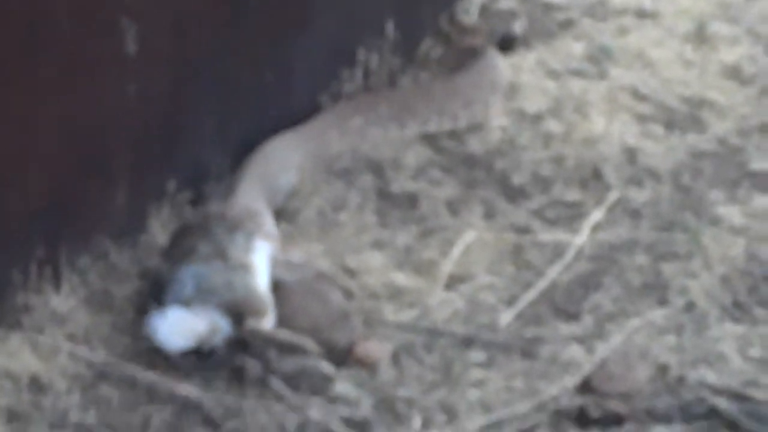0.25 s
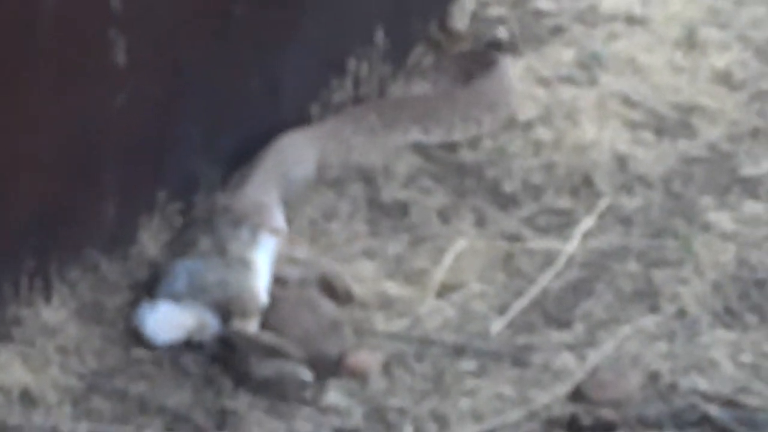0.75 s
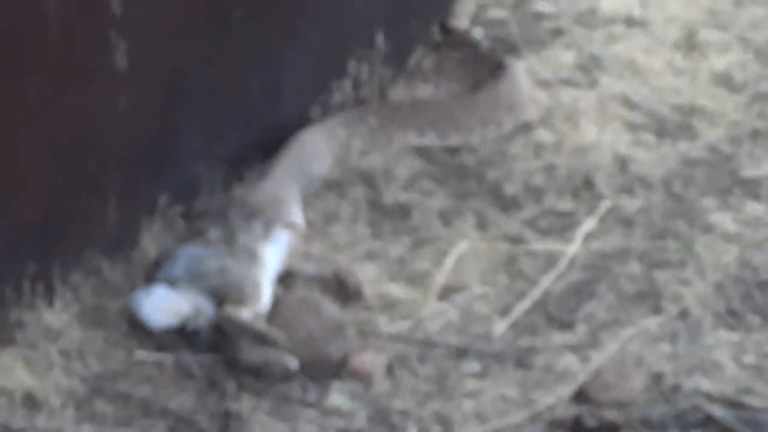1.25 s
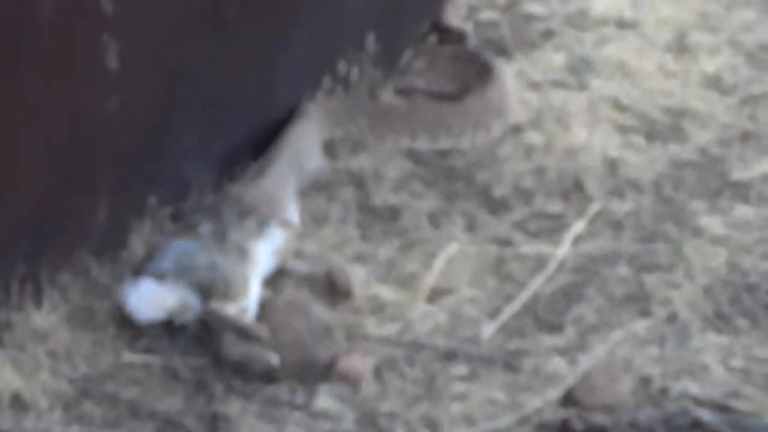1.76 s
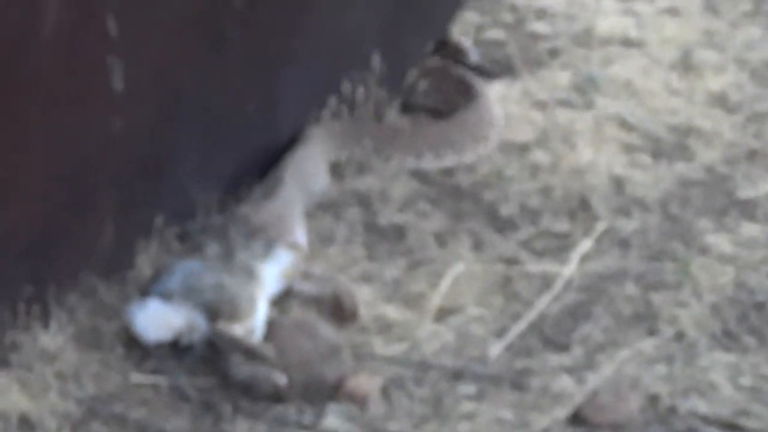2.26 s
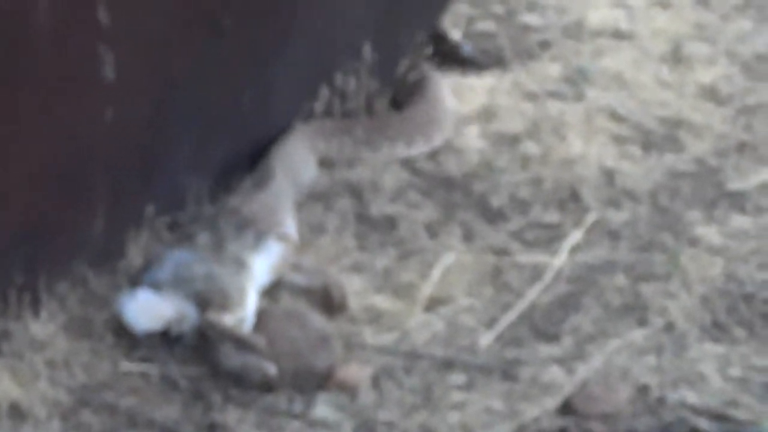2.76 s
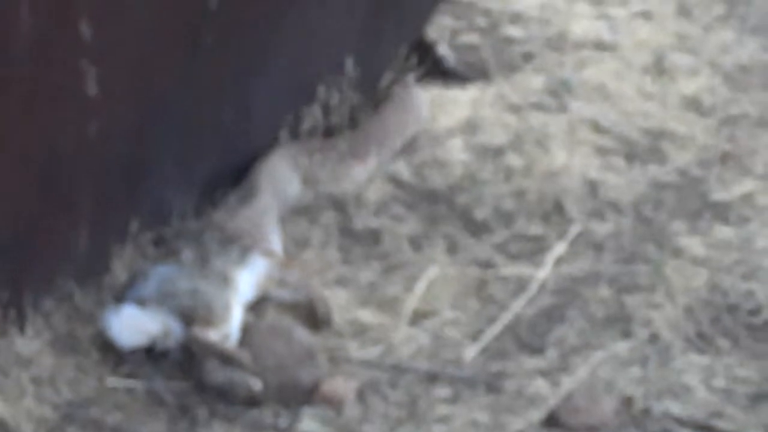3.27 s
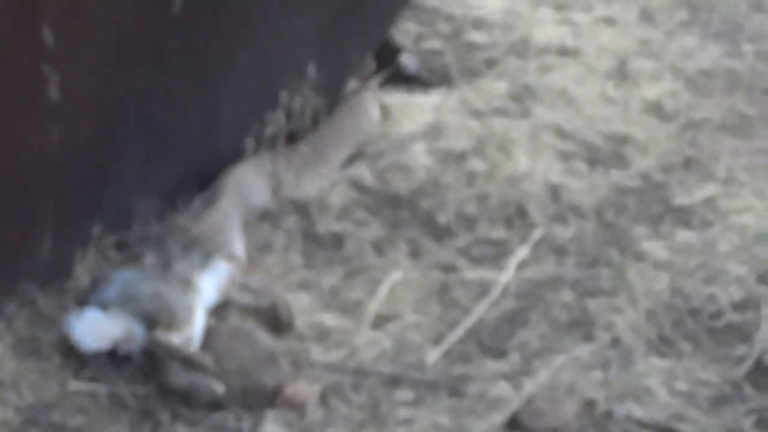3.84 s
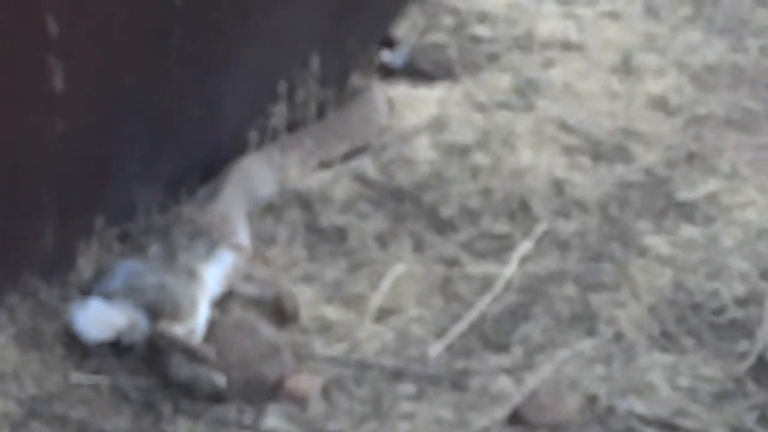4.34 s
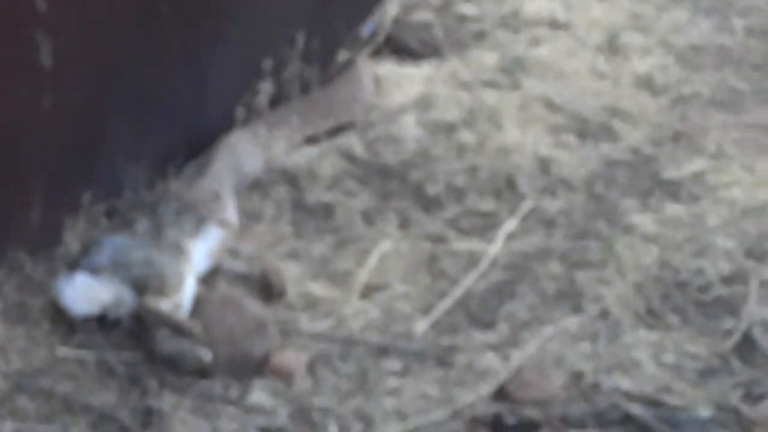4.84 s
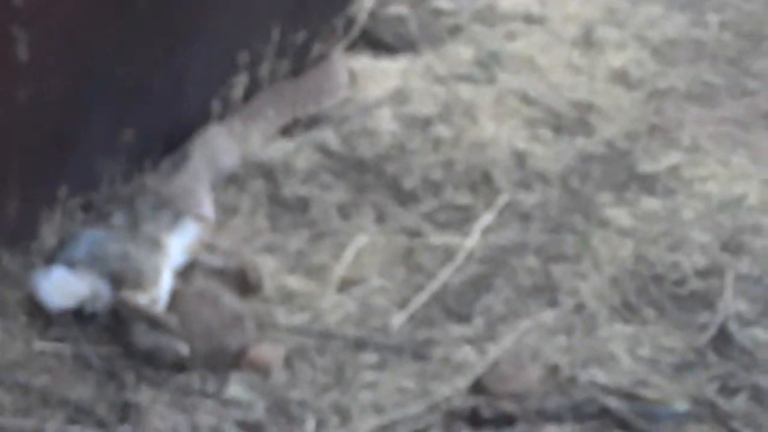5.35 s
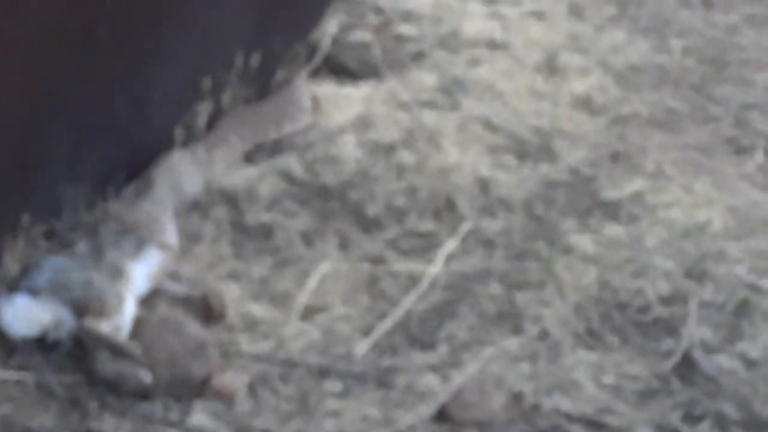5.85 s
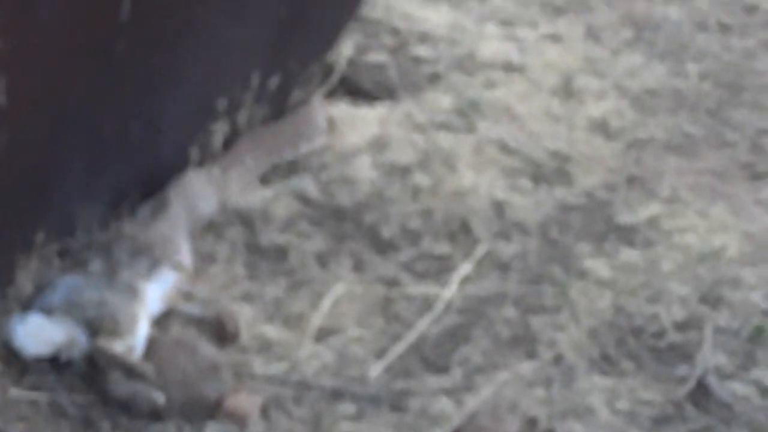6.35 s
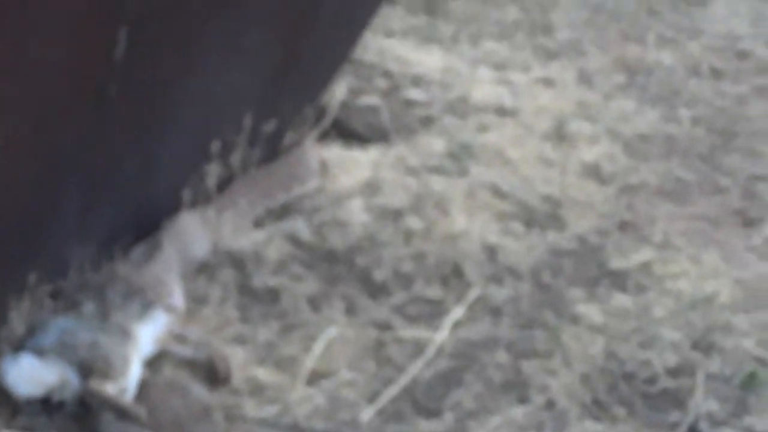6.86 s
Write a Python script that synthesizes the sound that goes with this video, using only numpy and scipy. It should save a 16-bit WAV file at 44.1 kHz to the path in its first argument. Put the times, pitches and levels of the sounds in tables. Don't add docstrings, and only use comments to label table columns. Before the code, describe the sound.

Harsh sizzling tail rattle over faint hiss, with a brief faint motor hum early on and a burst of dull wind buffeting near the end.

```python
import sys
import numpy as np
from scipy import signal
from scipy.fft import rfft, irfft, next_fast_len
from scipy.io import wavfile
from scipy.ndimage import uniform_filter1d, map_coordinates

SR = 44100
rng = np.random.default_rng(int(sys.argv[2]) if len(sys.argv) > 2 else 0)


def waveform_to_disk(signal):
    frames = np.transpose(np.atleast_2d(signal))
    scaled = np.clip(frames, -1, 1) * 32767
    samples = np.round(scaled).astype(np.int16)
    wavfile.write(sys.argv[1], SR, samples)


def level_to_linear(level):
    exponent = np.asarray(level, float) / 20
    return 10 ** exponent


N = 313103

# frequency in Hz, density in dB per Hz.
AIR_COLOUR = [(60, -5.5), (200, 2.5), (350, 6), (600, 0.5), (1000, 0), (1500, -1.5), (2000, -1.5),
              (2600, -6), (6000, -13.5), (16000, -4.5)]
# frequency in Hz, level in dB.
AIR_OWN = [(60, -32), (150, 9), (300, -3.5), (700, 4), (1400, -21.5), (3000, -11.5), (16000, -10)]
AIR_DB, AIR_FADE_DB_PER_S = -58, 0.746

# frequency in Hz, density in dB per Hz.
WIND_COLOUR = [(20, -2.5), (50, -14.5), (80, -9), (110, 9.5), (150, -5), (220, -6), (350, -24.5),
               (600, -23), (1200, -43)]
# frequency in Hz, level in dB.
WIND_OWN = [(20, -10), (60, -1), (150, -14), (500, -6)]
# middle in seconds, peak in dB, half length in seconds.
GUSTS = [
    (4.552, -51, 0.15),
    (4.903, -73, 0.055),
    (5.112, -58, 0.031),
    (5.76, -48, 0.037),
    (5.96, -48.5, 0.097),
    (6.368, -58.5, 0.18),
    (6.99, -67, 0.14),
]
# time in seconds, peak in dB, frequency in Hz.
EDDIES = [(4.418, -52, 110), (4.469, -42, 120), (4.536, -53, 102), (4.57, -45.5, 155), (4.607, -49, 109),
          (4.642, -44, 105), (4.662, -45, 108), (4.828, -48, 134), (5.147, -46, 123), (5.176, -46, 115),
          (5.685, -54, 110), (5.718, -46, 94), (5.748, -39, 101), (5.78, -30, 110), (5.805, -39, 192),
          (5.834, -36.5, 240), (5.844, -36.5, 134), (5.865, -42, 139), (5.885, -44, 95), (5.902, -44, 192),
          (5.918, -44, 120), (5.934, -31, 154), (5.951, -42, 111), (5.973, -43, 167), (6.001, -43, 126),
          (6.028, -35, 197), (6.048, -34, 149), (6.073, -39.5, 139), (6.099, -45, 120), (6.115, -46, 142),
          (6.18, -50, 114), (6.236, -46, 96.7), (6.389, -48, 121), (6.588, -50, 108)]
CALM_DB, CALM_FADE_DB_PER_S, FRESH_DB = -57, 2.1, -62
FRESHENS_S = 4.12
TURBULENT_S = 4.36
PORT_PHASE = -0.3

# start in seconds, stop in seconds, level in dB.
MOTOR_RUNS = [
    (0.483, 0.62, -64.5),
    (0.713, 1.76, -63.5),
]
MOTOR_HZ, MOTOR_EDGE_S, MOTOR_SAG_DB_PER_S = 229.3, 0.02, 2

# time in seconds, swings per second.
TAIL_SPEED = [(0.0, 63.58), (0.4, 64.59), (1.25, 63.64), (1.4, 63.02), (1.75, 63.35), (2.05, 61.97),
              (2.95, 60.31), (3.4, 60.94), (3.65, 60.3), (4.3, 61.92), (4.6, 61.81), (4.75, 62.91),
              (5.45, 61.07), (5.85, 61.07), (6.25, 60.73), (7.1, 60.65)]
FIRST_SWING = 2.2
# start in swings, level in dB, fade in swings, spread between swings in dB.
KNOCKS = [
    (-.12, .3, .045, 1.1),
    (0.0, -9, .11, 1.3),
    (.378, -3.5, .045, 1.5),
    (.55, -8.5, .08, 1.5),
]
# time in seconds, peak in dB.
HARD_KNOCKS = [(0.0256, -37), (0.0717, -29.5), (0.1049, -28.5), (0.183, -29), (0.2457, -27), (0.2772, -35),
               (0.3077, -28.5), (0.384, -32), (0.4778, -32.5), (0.5075, -33.5), (0.5874, -31.5),
               (0.6494, -32), (0.68, -30.5), (0.7415, -32), (0.7738, -28.5), (0.8505, -30), (1.0388, -36.5),
               (1.4485, -37), (1.5756, -35), (1.6543, -37), (1.6864, -36), (1.7489, -32.5), (1.7961, -32),
               (1.8462, -30), (1.9395, -32.5), (1.97, -35.5), (2.0843, -30), (2.1326, -31), (2.2157, -37.5),
               (2.2636, -28.5), (2.3034, -28), (2.36, -31), (2.4105, -28.5), (2.442, -34), (2.4738, -34),
               (2.5232, -28.5), (2.557, -32), (2.6562, -29), (2.7368, -34), (2.8526, -32.5),
               (2.8837, -32.5), (2.9176, -32), (2.9846, -29.5), (3.035, -29), (3.067, -37), (3.1342, -38),
               (3.3478, -36.5), (3.3964, -31.5), (3.4305, -33.5), (3.5787, -31), (3.6142, -36),
               (3.677, -35), (3.728, -37.5), (3.827, -38.5), (3.9427, -32), (4.006, -32), (4.2519, -32),
               (4.4133, -38), (4.5092, -30.5), (4.6385, -35.5)]
HARD_UNDER_DB, HARD_FADE_S = 13.5, 0.0006
# time in seconds, force in dB, turn in dB.
SHAKING = [(0, -40.5, -18.5), (0.8, -42, -15.5), (0.9, -43, -16), (1.0, -49, -6.5), (1.1, -50, -4.5),
           (1.3, -51.5, 1), (1.5, -46, -2.5), (2.1, -45.5, 1), (2.4, -44, -1), (3.0, -44.5, -2),
           (3.2, -46, -0.8), (3.8, -48.5, -3.5), (4.4, -47, -6), (4.7, -50, -6), (5.0, -54.5, -10.5),
           (5.8, -55, -7.5), (6.4, -58.5, -5.5), (7.09, -59, -5)]
MEAN_FORCE_DB = -48
CHATTER_DB, CONTACTS_PER_S, SIZE_SPREAD_DB = -17, 17000, 2.36
EVENNESS, KNOCK_SAMPLES = 0.75, 61
SHELTER_S, SHELTER_RAMP_S = 4.72, 0.15

# frequency in Hz, width in Hz, level in dB.
BODY = [(2868, 965, 2.5), (3216, 520, 10), (3796, 740, -2)]
# frequency in Hz, width in Hz, level in dB.
LARGE = [(4325, 472, 1.5), (5067, 645, 8.8)]
# frequency in Hz, width in Hz, level in dB.
SMALL = [(5680, 300, 3), (6794, 880, 0.5), (7495, 1000, 3.5), (8060, 1020, 1.3)]
# frequency in Hz, width in Hz, level in dB.
RIMS = [(9430, 780, -2)]
# frequency in Hz, width in Hz, level in dB.
EDGES = [(10980, 1680, 2.5), (12030, 1800, 6.5), (13800, 2420, 3), (14400, 990, 8), (16900, 1200, -16.5)]
# offset in dB, share of force, share of turn, loss in shelter in dB,
# growth of the right port's lag in samples.
ANSWERS = [
    (-58.5, 0.19, 0.064, -4, -0.16),
    (-47, 0.66, 0.67, -1.14, -0.36),
    (-49, 1, -0.011, 0.5, -0.14),
    (-65.5, 0.79, -0.33, -15, -0.31),
    (-55, 0.09, -0.18, -6, 0.63),
]

# frequency in Hz, left over right in dB.
SHADE = [(150, -3.5), (500, 4.5), (2000, -7.5), (2750, 4.5), (3700, -4), (4900, 3), (6100, 4.5), (7700, -9),
         (9000, 2.5), (10200, -4), (11000, -1.5), (11800, -8.5), (13200, 2), (14000, -4.5)]
LATE_SAMPLES = 16
OFFSET = 0.00128
# port, first frequency in Hz, last frequency in Hz, width in Hz, depth in dB.
GAPS = [(0, 5600, 5530, 227, 14), (0, 8030, 7500, 200, 4), (0, 10000, 9600, 250, 7.5),
        (0, 12200, 11400, 280, 8.5), (0, 13450, 12950, 230, 5), (0, 14600, 14700, 350, 3),
        (1, 5900, 5430, 303, 10), (0.999, 10360, 9830, 304, 1.5)]
# frequency in Hz, limit in dB.
DROP_SUM = [(60, -9), (170, -12), (300, -22), (2000, -14), (2330, -5), (2550, 6), (3100, 9), (3500, 3),
            (3900, -14), (5500, -8), (8300, -6), (10000, -2), (14000, -3), (15000, -1)]
# frequency in Hz, limit in dB.
DROP_DIFFERENCE = [(500, -22), (1000, -4), (1500, -8), (4000, -4), (4700, -13), (7000, -10), (9300, -6),
                   (12400, -5), (14200, -6), (14700, 0), (16000, 1)]
# frequency in Hz, level in dB.
UNHEARD = [(8600, -110), (9000, -83), (10300, -83), (10700, -110)]
MASKED_HZ, MASKED_DB = 14500, -29.5
FRAME_SHIFT = 861
WHOLE_SHARE, WHOLE_SHARE_LATE, LATE_S = 0.06, 0.2, 4.3


def in_time(rows):
    s, *columns = np.transpose(rows)
    return [np.interp(np.arange(N) / SR, s, column) for column in columns]


def at_hz(points, hz):
    table_hz, table_db = np.transpose(points)
    return np.interp(np.log(np.maximum(hz, 1)), np.log(table_hz), table_db)


def rms_one(x):
    return x / np.sqrt(np.mean(x ** 2) + 1e-20)


def coloured(x, points, share=1):
    size = next_fast_len(N)
    hz = np.arange(size // 2 + 1) * SR / size
    return irfft(rfft(x, size) * level_to_linear(share * at_hz(points, hz)), size)[..., :N]


def drift(rate):
    r = np.exp(-40 * np.pi * rate / SR)
    slow = signal.lfilter([1], [1, -2 * r, r * r], rng.standard_normal(N // 20 + 2002))[2000:]
    return np.interp(np.arange(N) / 20, np.arange(len(slow)), rms_one(slow))


def air():
    both, left, right = coloured(rng.standard_normal((3, N)), AIR_COLOUR)
    own = coloured(np.array([left, right]), AIR_OWN)
    level_db = AIR_DB - AIR_FADE_DB_PER_S * np.arange(N) / SR + 0.94 * drift(14)
    return level_to_linear(level_db) * rms_one(both + own)


def wind_db():
    t = np.arange(N) / SR
    power = level_to_linear(2 * np.where(t < FRESHENS_S, CALM_DB - CALM_FADE_DB_PER_S * t, FRESH_DB))
    for s, db, half_s in GUSTS:
        power = power + level_to_linear(2 * db) * np.exp(-((t - s) / half_s) ** 2)
    return 10 * np.log10(power)


def eddies():
    out = np.zeros((2, N))
    t = np.arange(-2000, 2000) / SR
    balance = level_to_linear(np.array([[0.5], [-0.5]]))
    for (s, db, hz), phase in zip(EDDIES, rng.uniform(0, 2 * np.pi, len(EDDIES))):
        at = round(s * SR)
        phase = phase + np.array([[0], [PORT_PHASE]])
        swell = np.exp(-(t * hz / 0.73) ** 2) * np.cos(2 * np.pi * hz * t + phase)
        core = 0.3 * np.exp(-(t * hz / 0.25) ** 2) * np.cos(2 * np.pi * 2.57 * hz * t + 2 * phase)
        out[:, at - len(t) // 2:at + len(t) // 2] += level_to_linear(db - 0.5) * (swell + core) * balance
    return out


def wind():
    both, left, right = coloured(rng.standard_normal((3, N)), WIND_COLOUR)
    gusty = np.clip((np.arange(N) / SR - TURBULENT_S) / 0.05, 0.2, 1)
    own = gusty * coloured(np.array([left, right]), WIND_OWN)
    lumpy = rms_one(level_to_linear(3.3 * drift(17)) * (both + own))
    return level_to_linear(wind_db() + 2.0) * lumpy + eddies()


def motor():
    t = np.arange(N) / SR
    turns = np.cumsum(MOTOR_HZ * (1 + 0.0017 * drift(1.9))) / SR
    running = np.zeros(N)
    for on, off, db in MOTOR_RUNS:
        gate = np.clip(np.minimum(t - on, off - t) / MOTOR_EDGE_S, 0, 1)
        running += level_to_linear(db - MOTOR_SAG_DB_PER_S * (t - on)) * gate
    return running * np.sin(2 * np.pi * turns) * level_to_linear(np.array([[2.5], [-12]])) * [[1], [-1]]


def knocking():
    swings = np.cumsum(in_time(TAIL_SPEED)[0]) / SR + FIRST_SWING
    chance = np.clip(rng.standard_normal((500, 2, len(KNOCKS))), -1.6, 1.6)
    power = level_to_linear(2 * CHATTER_DB) * np.ones(N)
    for k, (start, db, fade, spread_db) in enumerate(KNOCKS):
        since = swings - start
        force, early = chance[since.astype(int), :, k].T
        since = since % 1 - 0.018 * np.abs(early)
        rise = np.clip(since / 0.01, 0, 1)
        power += rise * level_to_linear(2 * (db + spread_db * force)) * np.exp(-since / fade)
    s, peak_db = np.transpose(HARD_KNOCKS)
    force_db = np.interp(s, *np.transpose(SHAKING)[:2])
    hard = np.zeros(N)
    hard[(s * SR).astype(int) + 20] = level_to_linear(2 * (peak_db - force_db - HARD_UNDER_DB))
    hard = signal.lfilter([1], [1, -np.exp(-1 / (HARD_FADE_S * SR))], hard)
    return np.sqrt(power + hard)


def resonance(x, hz, width_hz):
    r = np.exp(-np.pi * width_hz / SR)
    peak = [(1 - r * r) / 2, 0, (r * r - 1) / 2, 1, -2 * r * np.cos(2 * np.pi * hz / SR), r * r]
    return signal.sosfilt([peak, peak], x)


def shell_group(shells, force, given, slip):
    sizes = level_to_linear(SIZE_SPREAD_DB * np.minimum(rng.exponential(1, N), 2))
    sizes = sizes * (rng.random(N) < CONTACTS_PER_S / SR)
    both, left, right = rng.standard_normal((3, N))
    struck = force * sizes * (np.sign(both) + 0.41 * np.array([left, right]))
    group = np.zeros((2, N))
    for k, (hz, width_hz, db) in enumerate(shells):
        group += (-1) ** k * level_to_linear(db) * resonance(struck, hz, 1.6 * width_hz)
    group = rms_one(group)
    energy = uniform_filter1d(np.mean(group ** 2, axis=0) + 1e-4, KNOCK_SAMPLES)
    group = group * (given / energy) ** (EVENNESS / 2)
    heard_at = np.arange(N) - slip * (np.arange(N) / N - 0.45)
    group[1] = map_coordinates(group[1], [heard_at], order=3, mode="nearest")
    return rms_one(group)


def rattle():
    force, out = knocking(), np.zeros((2, N))
    given = uniform_filter1d(np.roll(rms_one(force) ** 2, 14), KNOCK_SAMPLES)
    force_db, turn_db = in_time(SHAKING)
    hidden = np.clip((np.arange(N) / SR - SHELTER_S) / SHELTER_RAMP_S, 0, 1)
    groups = (BODY, LARGE, SMALL, RIMS, EDGES)
    for shells, (offset_db, by_force, by_turn, loss_db, slip) in zip(groups, ANSWERS):
        level_db = offset_db + by_force * (force_db - MEAN_FORCE_DB) + by_turn * turn_db + loss_db * hidden
        out += level_to_linear(level_db) * shell_group(shells, force, given, slip)
    return out


def scene():
    return air() + wind() + motor() + rattle()


def cut_gaps(ports, hz, s):
    for port, first_hz, last_hz, width_hz, depth_db in GAPS:
        centre_hz = first_hz + (last_hz - first_hz) * s * SR / N
        ports[int(port)] *= level_to_linear(-depth_db * np.exp(-((hz[:, None] - centre_hz) / width_hz) ** 2))
    return ports


def joint_stereo(left, right):
    padded = np.pad([left, right], ((0, 0), (FRAME_SHIFT, 0)))
    hz, s, ports = signal.stft(padded, SR, nperseg=2048)
    s = s - FRAME_SHIFT / SR
    ports = cut_gaps(ports, hz, s)
    spectra = np.array([ports[0] + ports[1], ports[0] - ports[1]]) / 2
    starts = np.r_[0, 8:40:4, 40:96:8, 96:144:12, 144:264:8, 264:len(hz):16]
    band_hz = hz[starts]
    power = np.add.reduceat(np.abs(spectra) ** 2, starts, axis=1)
    waver_db = np.interp(s * SR, np.arange(N), 2.5 * drift(14)) + 1.8 * rng.standard_normal(power.shape)
    limit_db = np.array([at_hz(DROP_SUM, band_hz), at_hz(DROP_DIFFERENCE, band_hz)])[..., None] + waver_db
    limit_db[0] -= 15 * np.outer(band_hz < 400, s > TURBULENT_S)
    whole = rng.random(len(s)) < np.where(s < LATE_S, WHOLE_SHARE, WHOLE_SHARE_LATE)
    limit_db -= 20 * np.outer(band_hz > 4000, whole)
    kept = power > power[::-1] * level_to_linear(2 * limit_db)
    kept &= power > level_to_linear(2 * (at_hz(UNHEARD, band_hz)[:, None] + waver_db))
    rattle_power = power[:, band_hz > 2000].sum(axis=(0, 1))
    kept &= (band_hz < MASKED_HZ)[:, None] | (power > rattle_power * level_to_linear(2 * (MASKED_DB + waver_db)))
    kept = np.repeat(kept, np.diff(np.r_[starts, len(hz)]), axis=1)
    _, parts = signal.istft(spectra * kept, SR, nperseg=2048)
    total, difference = parts[:, FRAME_SHIFT:FRAME_SHIFT + N]
    return np.array([total + difference, total - difference])


def roll_off(x):
    return signal.sosfilt(signal.butter(12, 15770, fs=SR, output="sos"), x)


def record(dry):
    left = coloured(dry[0], SHADE, share=1 / 2)
    right = coloured(dry[1], SHADE, share=-1 / 2)
    right = -np.pad(right, (LATE_SAMPLES, 0))[:N]
    mix = joint_stereo(left, right) + OFFSET * np.array([[-1], [1]])
    return roll_off(mix)


dry = scene()
out = record(dry)
waveform_to_disk(out)
```